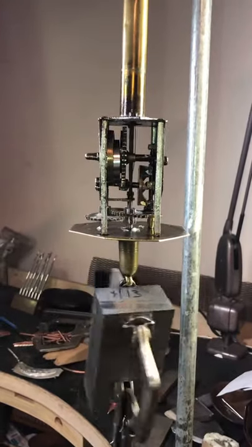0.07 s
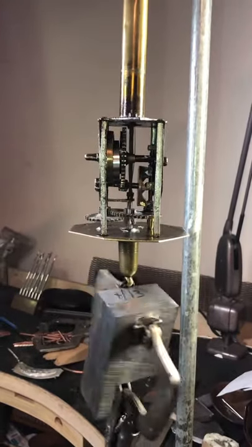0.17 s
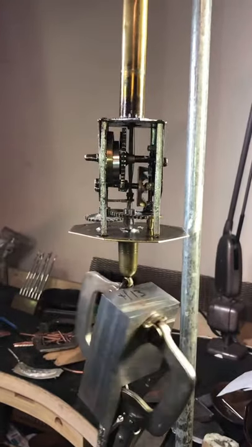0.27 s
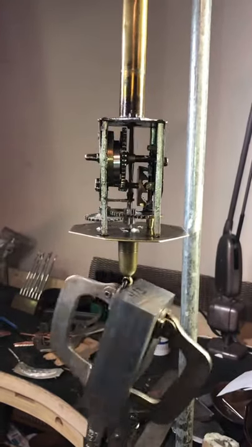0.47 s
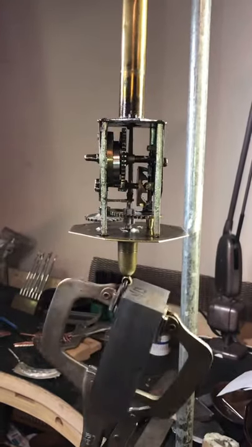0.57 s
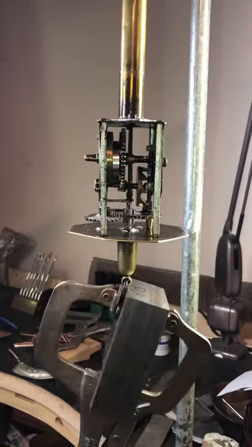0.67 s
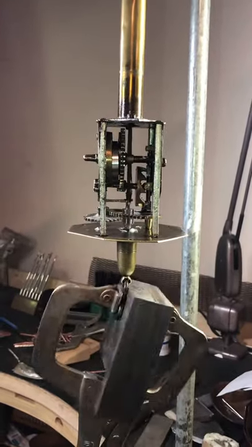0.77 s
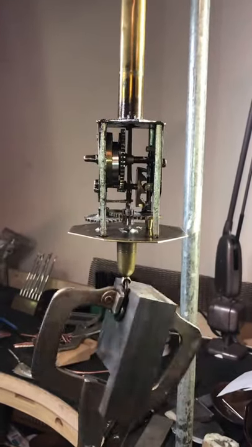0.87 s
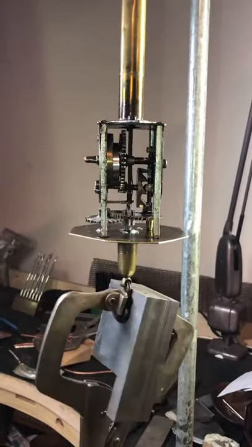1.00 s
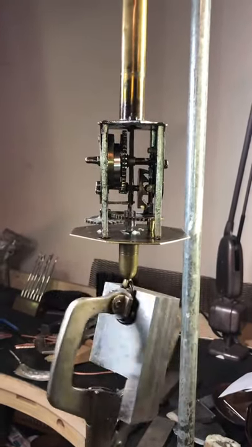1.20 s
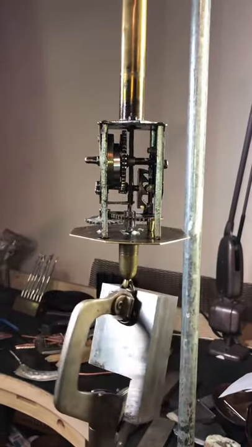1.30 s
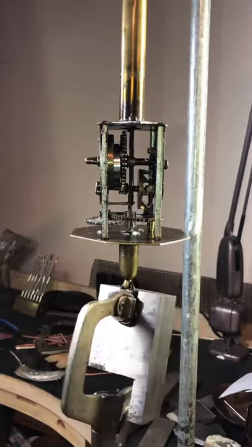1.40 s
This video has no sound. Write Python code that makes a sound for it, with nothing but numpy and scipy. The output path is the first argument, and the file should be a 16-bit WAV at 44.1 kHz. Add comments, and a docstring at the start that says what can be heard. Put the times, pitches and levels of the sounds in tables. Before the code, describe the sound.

A small hanging clockwork mechanism gives one sharp, close steel click at about 0.2 seconds, just after a barely audible tap and tick. Its gears and plates ring briefly, fading quickly with a short workshop echo. Two very faint, distant chirps follow at around 0.5 and 0.9 seconds. Low room noise and a soft hum continue throughout.

```python
"""Low room noise and a soft hum run throughout in a small workshop.
Something loose taps lightly; at 0.19 s a hanging, spring-driven clockwork gives a faint tick.
At 0.21 s it lets go with one sharp steel click: teeth clash, the loose works shiver,
gears and plates ring briefly, then stand, bench and room answer.
Two faint, distant chirps follow at 0.5 s and 0.94 s."""
import sys
import numpy as np
from scipy import signal
from scipy.fft import rfft, irfft
from scipy.io import wavfile
from scipy.ndimage import uniform_filter1d

SR = 44100
rng = np.random.default_rng(int(sys.argv[2]) if len(sys.argv) > 2 else 0)


def digitize_waveform(pressure):
    """Quantize a signal to 16-bit integers and store it at the path in sys.argv[1].

    Rows of a 2-D input are taken as channels; values are limited to [-1, 1].
    """
    field = np.atleast_2d(pressure).T
    bounded = np.clip(field, -1, 1)
    quanta = np.round(bounded * 32767).astype(np.int16)
    wavfile.write(sys.argv[1], SR, quanta)


N = 63945
TIME_S = np.arange(N) / SR


def amp(db):
    """Decibels to gain."""
    return 10 ** (np.asarray(db) / 20)


def unit(x):
    """Scale to rms 1."""
    return x / np.sqrt(np.mean(x ** 2) + 1e-20)


def read(points, hz):
    """Interpolate a table on a log-frequency axis."""
    freq_hz, value = np.transpose(points)
    return np.interp(np.log(hz + 1), np.log(freq_hz + 1), value)


def add(mix, start_s, sound):
    """Mix a sound in at start_s."""
    part = mix[round(start_s * SR):][:len(sound)]
    part += sound[:len(part)]


def noise(spectrum):
    """Coloured noise, rms 1."""
    gain = amp(read(spectrum, np.fft.rfftfreq(N, 1 / SR)))
    return unit(irfft(rfft(rng.standard_normal(N)) * gain, N))


def room_noise():
    """Low wash, gently uneven in time and frequency."""
    # noise spectrum: freq_hz, density_db
    spectrum = [(15, -36.5), (25, -22), (45, -8.5), (100, -1), (140, -5), (300, -9), (520, -10.5),
                (800, -14), (1260, -19), (2600, -23), (3400, -24), (5700, -30.5), (8800, -34),
                (16000, -38.5)]
    level_db, patch_db = -65, 1.12
    bands = signal.stft(noise(spectrum), nperseg=1024, noverlap=768)[2]
    patches = uniform_filter1d(rng.standard_normal(bands.shape), size=14, axis=0)
    patches = unit(uniform_filter1d(patches, size=16, axis=1))
    wash = signal.istft(bands * amp(patch_db * patches), nperseg=1024, noverlap=768)[1][:N]
    return amp(level_db) * unit(wash)


def hum():
    """Wavering hum and whine: narrow bands of noise."""
    # hum bands: centre_hz, width_hz, level_db
    bands = [(102.8, 4, -77), (343, 40, -79.5), (8850, 400, -92)]
    freq_hz = np.fft.rfftfreq(N, 1 / SR)
    out = np.zeros(N)
    for centre_hz, width_hz, level_db in bands:
        peak = 1 / (1 + (2 * (freq_hz - centre_hz) / width_hz) ** 2)
        out += amp(level_db) * unit(irfft(rfft(rng.standard_normal(N)) * peak, N))
    return out


def tap():
    """One light, dull tap of something loose, with its room echo."""
    # tap spectrum: freq_hz, density_db
    spectrum = [(500, -37), (1500, -6.5), (2800, 3), (6000, -6.5), (9000, -12), (16000, -40)]
    start_s, level_db, t60_s = 0.029, -61.5, 0.057
    out = np.zeros(N)
    add(out, start_s, amp(level_db - 60 * TIME_S / t60_s) * noise(spectrum))
    return out + room_echo(out)


def room_tail(x):
    """Shape noise into a tail: quick build-up, each band dying at its own rate."""
    # room decay: freq_hz, t60_s
    decay = [(200, .4), (600, .28), (1400, .33), (3700, .34), (7700, .36), (12000, .265), (16000, .23)]
    delay_s, build_s = 0.018, 0.0092
    freq_hz, frame_s, bands = signal.stft(x, SR, nperseg=256)
    fade = amp(-60 * frame_s / read(decay, freq_hz)[:, None])
    tail = signal.istft(bands * fade, SR, nperseg=256)[1][:N]
    return tail * np.clip((TIME_S - delay_s) / build_s, 0, 1)


def room_echo(x, gain_db=-23.5):
    """Workshop reverberation of x."""
    response = room_tail(rng.standard_normal(N))
    return amp(gain_db) * signal.fftconvolve(x, response / np.linalg.norm(response))[:N]


def colour(burst, spectrum):
    """Give a burst a smooth spectrum, energy 1; minimum phase keeps the attack sharp."""
    bins = np.fft.fft(burst[:4096])
    freq_hz = abs(np.fft.fftfreq(len(bins), 1 / SR))
    log_gain = np.log(amp(read(spectrum, freq_hz)) / (abs(bins) + abs(bins).mean() / 10))
    out = np.fft.ifft(bins * np.exp(np.conj(signal.hilbert(log_gain)))).real
    return np.pad(out / np.linalg.norm(out), (0, N - len(bins)))


def ring(modes):
    """Sum of decaying sines, random phases."""
    return sum(amp(level_db - 60 * TIME_S / t60_s) * np.sin(2 * np.pi * (pitch_hz * TIME_S + rng.random()))
               for pitch_hz, level_db, t60_s in modes)


def teeth_clash():
    """Teeth scrape for a moment, then part."""
    # broad, short resonances: freq_hz, density_db
    spectrum = [(300, -39.5), (800, -43), (1700, -9), (2400, -32.5), (3100, -3.5), (3650, -8), (4350, -4),
                (4700, -17.5), (5150, -12.5), (5600, 4), (6200, -7), (7300, 5), (7900, 4), (8500, -2.5),
                (9000, -2), (9900, -21.5), (10300, -7.5), (11200, -15), (12300, -3.5), (13000, -13.5),
                (13500, -0.5), (14300, -9), (14800, -15.5), (15500, -10), (16200, -24.5)]
    gain_db, hold_s, t60_s = 5.5, 0.0018, 0.0016
    envelope = amp(-60 * np.maximum(TIME_S - hold_s, 0) / t60_s)
    return amp(gain_db) * colour(envelope * rng.standard_normal(N), spectrum)


def works():
    """Loose works shiver, steel gears and plates ring; such small parts radiate little bass."""
    # shiver spectrum: freq_hz, density_db
    spectrum = [(400, -26), (900, -21.5), (1500, -8), (2500, -2), (3600, 6), (5500, -1.5), (7000, 1.5),
                (7700, 3.5), (9200, -1), (9900, -2), (11300, -4), (12400, 14.5), (13000, -6.5),
                (14300, 1.5), (15700, -5)]
    # steel modes: pitch_hz
    modes_hz = [1215, 1430, 3125, 3672, 7030, 7385, 7718, 8068, 8850, 9080, 9285, 12200, 12472, 13540,
                14285]
    # steel modes: level_db
    modes_db = [-47, -43.5, -29.5, -25, -30, -25, -24.5, -26, -34, -27.5, -34, -28.5, -24.5, -29.5, -30.5]
    rattle_db, rattle_t60_s = -17, 0.045
    steel_t60_s, cutoff_hz = 0.042, 1190
    rattle = amp(rattle_db - 60 * TIME_S / rattle_t60_s) * noise(spectrum)
    steel = ring([(hz, db, steel_t60_s) for hz, db in zip(modes_hz, modes_db)])
    radiation = signal.butter(4, cutoff_hz, "high", fs=SR, output="sos")
    return signal.sosfilt(radiation, rattle + steel)


def stand(rise_s=0.022):
    """Frame and stand take up the blow; their low ringing builds slowly."""
    # frame and stand modes: pitch_hz, level_db, t60_s
    modes = [(158, -56.5, 0.52), (364.7, -43, 0.086), (688, -47, 0.23)]
    return np.minimum(TIME_S / rise_s, 1) ** 2 * ring(modes)


def bench(gain_db=-37.5, peak_s=0.011):
    """The cluttered bench scatters the click."""
    # reflection spectrum: freq_hz, density_db
    spectrum = [(200, -28), (600, -20), (1050, 3.5), (1600, 6), (2200, -2), (3000, 0.5), (8000, -6),
                (15000, -15)]
    envelope = (TIME_S / peak_s * np.exp(1 - TIME_S / peak_s)) ** 2
    return amp(gain_db) * envelope * noise(spectrum)


def clockwork(diffuse_db=-37.5):
    """Faint tick, then the click: each catch rings the same works in the same room."""
    # catches of the mechanism: start_s, gain_db
    catches = [(0.1882, -49.5), (0.2121, 0), ]
    # room's diffuse answer to the clash: freq_hz, density_db
    diffuse_spectrum = [(150, -2.5), (330, 2.5), (500, -4.5), (1000, 0), (2300, 0), (3400, 2), (5000, 0),
                        (6100, 0.5), (7700, -3.5), (9000, -1), (10300, -7.5), (11600, -5), (12400, 3),
                        (13000, -3.5), (15600, -4)]
    out = np.zeros(N)
    for start_s, gain_db in catches:
        near = teeth_clash() + works() + stand() + bench()
        echo = room_echo(near)
        diffuse = amp(diffuse_db) * room_tail(noise(diffuse_spectrum))
        add(out, start_s, amp(gain_db) * (near + echo + diffuse))
    return out


def chirps(echo_t60_s=1.8):
    """Thin, fuzzy whistles that arch in pitch, blurred by a long echo."""
    # distant chirps: start_s, length_s, pitch_hz, arch_hz, width_hz, level_db
    whistles = [(0.498, 0.12, 2926, 677, 334, -73), (0.943, .122, 2478, 89.4, 199, -75)]
    out = np.zeros(N)
    for start_s, length_s, pitch_hz, arch_hz, width_hz, level_db in whistles:
        arch = np.sin(np.pi * np.linspace(0, 1, round(length_s * SR)))
        white = rng.standard_normal(N) + 1j * rng.standard_normal(N)
        fuzz = signal.lfilter(*signal.butter(2, width_hz / 2, fs=SR), white)[:len(arch)]
        phase_rad = 2 * np.pi * np.cumsum(pitch_hz + arch_hz * arch) / SR
        whistle = (fuzz * np.exp(1j * phase_rad)).real
        add(out, start_s, amp(level_db) * unit(abs(arch) ** 0.1 * whistle))
    response = rng.standard_normal(N) * amp(-60 * TIME_S / echo_t60_s)
    return out + signal.fftconvolve(out, response / np.linalg.norm(response))[:N]


def scene():
    """Mono mix: clockwork close by, the rest far behind."""
    return (clockwork() + tap() + chirps() + room_noise() + hum())[None]


def record(dry):
    """Band limit: steep low-pass."""
    cutoff_hz = 15850
    lowpass = signal.firwin(255, cutoff_hz, window=("kaiser", 8), fs=SR)
    return signal.oaconvolve(dry, lowpass[None], "same")


dry = scene()
out = record(dry)
digitize_waveform(out)
```